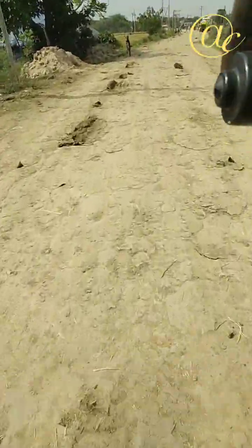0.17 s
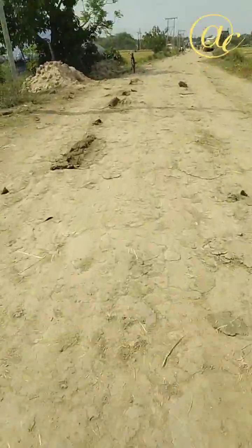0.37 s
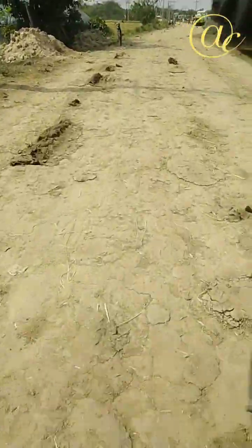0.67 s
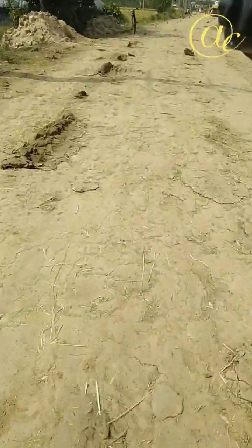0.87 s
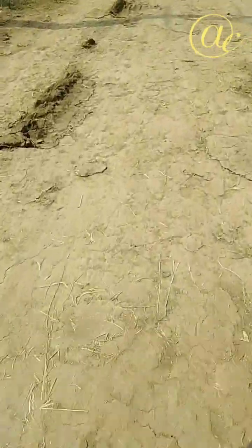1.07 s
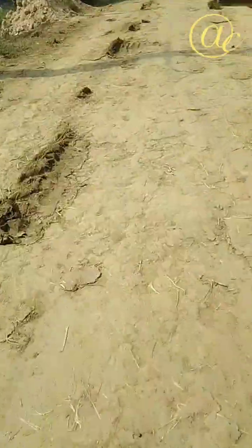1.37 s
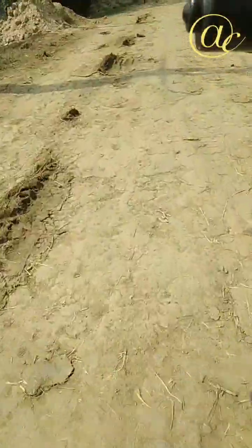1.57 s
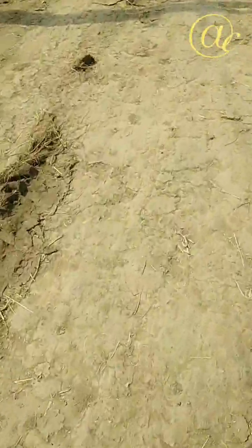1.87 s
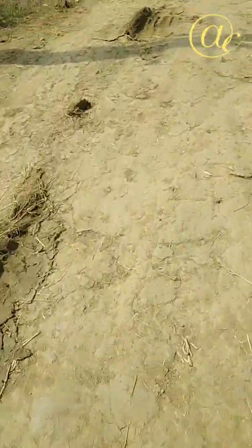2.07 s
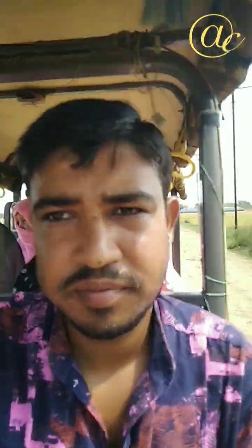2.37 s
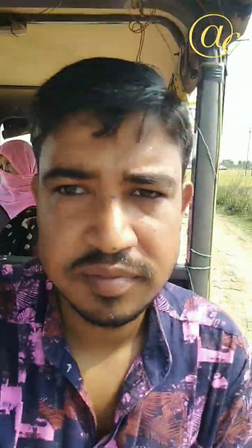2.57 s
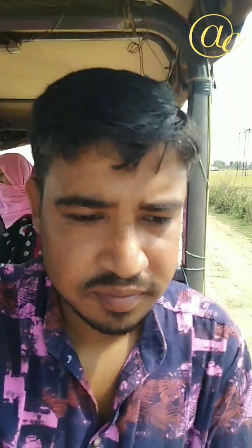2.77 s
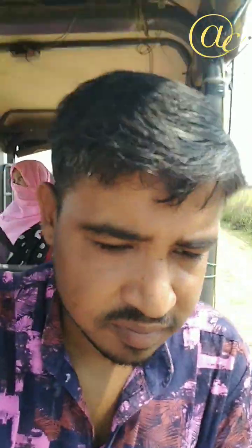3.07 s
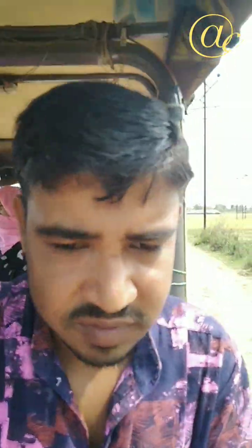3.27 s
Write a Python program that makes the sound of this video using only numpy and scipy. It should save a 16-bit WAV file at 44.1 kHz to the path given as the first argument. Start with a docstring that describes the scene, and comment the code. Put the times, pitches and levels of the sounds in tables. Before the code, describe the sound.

Rattling of a small covered vehicle on dried mud, with low booming, thuds and metallic clacks

```python
"""Tyres grind over a rutted road of dried mud while a small covered three-wheeler rolls along slowly.
The cabin sways and booms as filtered noise, and the wheels thud as short tones that sink in pitch.
Loose panels knock, metal fittings clack and small parts jingle: random tiny contacts that set resonances ringing.
The microphone first faces the road; after a short silent break it is inside the cabin, close to the knocks."""
import sys
import numpy as np
from scipy import signal
from scipy.fft import rfft, irfft
from scipy.io import wavfile

SR = 44100
rng = np.random.default_rng(int(sys.argv[2]) if len(sys.argv) > 2 else 0)


def file_out(sig):
    """Save sig as 16-bit WAV at sys.argv[1]."""
    # one column per channel
    cols = np.atleast_2d(sig).T
    # limit, then scale
    lim = np.clip(cols, -1, 1)
    pcm = np.round(lim * 32767).astype(np.int16)
    wavfile.write(sys.argv[1], SR, pcm)


N = 149940
TIME = np.arange(N) / SR
BREAK_FROM_S, BREAK_TO_S = 2.034, 2.274
CUTOFF_HZ = 15900
STRIKE_S = 0.0016  # time constant of a first strike
CLINK_T60_S = .024  # ringing of small metal pieces

# Bright colour of metal inside the cabin. Each row: frequency in Hz, relative density in dB.
METAL_COLOUR = [(800, -15.5), (2400, 5), (3500, -7.5), (4600, -5), (5500, -0.5), (6600, 1.5), (8000, -1),
                (9300, -12), (16000, -14)]


def from_db(db):
    """Decibels to gain."""
    return 10 ** (np.asarray(db) / 20)


def rms_one(x):
    """Scale to rms 1."""
    return x / np.sqrt(np.mean(x ** 2) + 1e-20)


def noise():
    """White noise of rms 1."""
    return rng.standard_normal(N)


def level(rows):
    """Gain over time, joined in straight lines of dB between rows of seconds and dB."""
    return from_db(np.interp(TIME, *np.transpose(rows)))


def drift(rate_hz):
    """Slow random wandering with spread 1: noise through two equal poles at rate_hz."""
    step = 40  # samples between the computed points
    pole = np.exp(-2 * np.pi * rate_hz * step / SR)
    settling = 2000  # points dropped while the filter starts up
    raw = rng.standard_normal(N // step + 2 + settling)
    slow = signal.lfilter([1], [1, -2 * pole, pole * pole], raw)[settling:]
    return np.interp(np.arange(N) / step, np.arange(len(slow)), rms_one(slow))


def colour(x, spectrum, size=8192):
    """Causal filter with the given spectrum, 12 dB per octave beyond its ends; white noise keeps its power."""
    hz, db = np.transpose(spectrum)
    octave = np.log2(np.maximum(np.arange(size // 2 + 1) * SR / size, 1))
    outside = np.abs(octave - np.clip(octave, np.log2(hz[0]), np.log2(hz[-1])))
    gain = from_db(np.interp(octave, np.log2(hz), db) - 12 * outside)
    # Folding the cepstrum forward gives minimum phase, so nothing sounds ahead of its cause.
    cepstrum = irfft(np.log(gain))
    cepstrum[1:size // 2] *= 2
    cepstrum[size // 2 + 1:] = 0
    response = irfft(np.exp(rfft(cepstrum)))
    return signal.fftconvolve(x, response / np.linalg.norm(response))[:N]


def ring(x, modes):
    """Decaying modes (Hz, dB, t60 in s) driven by x; white noise keeps its power."""
    t = TIME[:SR // 2]
    response = np.zeros(len(t))
    for hz, db, t60 in modes:
        response += from_db(db - 60 * t / t60) * np.sin(2 * np.pi * hz * t)
    return signal.fftconvolve(x, response / np.linalg.norm(response))[:N]


def grains(rate, spread_db):
    """Random tiny contacts, rate per second, of uneven size and either sign; rms 1."""
    sizes = from_db(spread_db * np.minimum(rng.exponential(1, N), 4))
    signs = rng.choice([-1, 1], N)
    touching = rng.random(N) < rate / SR
    return rms_one(sizes * signs * touching)


def scatter(contacts, top_hz, t60, count):
    """Each contact rings one of many resonances spread evenly up to top_hz; the power is kept."""
    dealt = rng.integers(0, count, N)
    pitches = (np.arange(count) + rng.uniform(.2, .8, count)) * top_hz / count
    r = from_db(-60 / (t60 * SR))  # decay per sample
    out = np.zeros(N)
    for k, w in enumerate(2 * np.pi * pitches / SR):
        share = contacts * (dealt == k) + 1e-18  # the tiny offset keeps the filter off denormals
        out += signal.lfilter([1, -r * np.cos(w)], [1, -2 * r * np.cos(w), r * r], share)
    return out * np.sqrt(2 * (1 - r * r))


def since_blow(s):
    """Seconds since the moment s, held between 0 and 1."""
    return np.clip(TIME - s, 0, 1)


def chatter(rows, t60, strike_db, tail_db, tail_t60, linger=0):
    """Envelope of blows: a first strike, a spell of chatter, a decay that lingers with its length, a faint tail."""
    power = np.zeros(N)
    for s, db, length in rows:
        after = since_blow(s + length)
        decay = from_db(-60 * after / (t60 + linger * length))
        tail = from_db(tail_db - 60 * after / tail_t60)
        strike = from_db(strike_db) * np.exp(-since_blow(s) / STRIKE_S)
        power += (from_db(db) * (TIME >= s) * (decay + tail + strike)) ** 2
    return np.sqrt(power)


def swell(s, length):
    """A smooth bump centred on s, with length measured between its 1/e points."""
    return np.exp(-np.minimum((2 * (TIME - s) / length) ** 2, 50))


def inside(outer, inner):
    """The first sound while facing the road, the second in the cabin from the end of the break."""
    return np.where(TIME < BREAK_TO_S, outer, inner)


def tyres():
    """Tyres grind over crusted mud and set the chassis ringing; grit crackles under them."""
    # Loudness of the grind. Each row: time in seconds, level in dB.
    rolling = [(0, -48), (.3, -46.5), (.47, -52.5), (.62, -48), (.9, -51.5), (1.15, -47.5), (1.6, -45.5),
               (1.75, -51.5), (2.5, -49), (2.9, -44), (3.14, -48), (3.4, -49)]
    # Colour of the grind. Each row: frequency in Hz, relative density in dB.
    grind_colour = [(250, 3), (350, 5.5), (500, 1), (750, 2), (1200, 2.5), (1600, -1.5), (2200, -5),
                    (3000, -13.5), (3900, -14), (5000, -22.5)]
    # Colour of the grit heard from the road side. Each row: frequency in Hz, relative density in dB.
    grit_colour = [(2500, -26), (3900, -3), (5000, -8), (7600, 2.5), (9200, -8.5), (12000, -12),
                   (15500, -4)]
    contacts = grains(rate=3600, spread_db=1.5)
    chassis = scatter(contacts, top_hz=4568, t60=.038, count=60)
    grind = level(rolling) * colour(chassis + from_db(-25.5) * contacts, grind_colour)
    crackle = grains(rate=5000, spread_db=3.5) * from_db(2.73 * drift(40))
    grit_outside = from_db(-54.5) * colour(crackle, grit_colour)
    grit_inside = from_db(-54) * colour(crackle, METAL_COLOUR)
    return grind + inside(grit_outside, grit_inside)


def body():
    """The body rocks in the ruts, and the road shakes the cabin at its low resonance."""
    # Ruts that rock the body. Each row: deepest moment in seconds, length in s, added level in dB.
    ruts = [(0.22, 0.11, -43), (1.02, 0.05, -32.5), (1.487, 0.46, -42.5), (2.589, 0.065, -32),
            (2.94, 0.21, -32), (3.233, 0.22, -41.5)]
    # Loudness of the boom. Each row: time in seconds, gain in dB.
    booming = [(0, -40.5), (.47, -42.5), (.7, -42.5), (.87, -45.5), (1.58, -39.5), (1.8, -45.5),
               (2.57, -39.5), (2.78, -45.5), (2.95, -39), (3.4, -42.5)]
    # Colour of the rocking. Each row: frequency in Hz, relative density in dB.
    sway_colour = [(10, -10.5), (38, -6.5), (70, -26.5), (150, -45)]
    # Colour of the broad part of the boom. Each row: frequency in Hz, relative density in dB.
    boom_colour = [(50, -15.5), (95, -4.5), (118, -7.5), (138, -3), (215, -8.5), (255, -17.5), (500, -40.5)]
    rocking = from_db(-43.5) + sum(from_db(db) * swell(s, length) for s, length, db in ruts)
    sway = rocking * colour(noise(), sway_colour)
    broad_boom = from_db(-1) * colour(noise(), boom_colour)
    resonance_hz, resonance_t60_s = 140.8, 0.14
    ringing_boom = from_db(-4) * rms_one(ring(noise(), [(resonance_hz, 0, resonance_t60_s)]))
    return sway + level(booming) * (broad_boom + ringing_boom)


def thuds():
    """The wheels drop into hollows with a short low thud that sinks in pitch."""
    # Each row: centre in seconds, pitch at the centre in Hz before a slight random drift, peak level in dB.
    drops = [(.01, 123, -34), (.705, 205.5, -39.5), (1.005, 139.7, -37), (1.29, 134, -37),
             (1.335, 204, -37), (1.372, 149.8, -36.5), (1.577, 151.3, -36.5), (1.68, 145.7, -30.5),
             (1.98, 138.8, -35.5), (2.915, 134.7, -35), (3.284, 129, -35)]
    length_s, sag_hz_per_s = .06, 280
    out = np.zeros(N)
    for s, hz, db in drops:
        sag = sag_hz_per_s * np.clip(TIME - s, -length_s, length_s)
        pitch = hz - sag + 5 * drift(26)
        out += from_db(db) * swell(s, length_s) * np.sin(2 * np.pi * np.cumsum(pitch) / SR)
    return out


def panels():
    """Loose panels chatter in uneven crunches, and each knock rings hollowly at a pitch of its own."""
    # Each row: start in seconds, relative level in dB, length of the chatter in s, mean panel pitch in Hz.
    knocks = [(0.514, -36.5, 0.0049, 981), (0.615, -37.5, 0.019, 812), (0.684, -38, 0.0035, 1501),
              (0.945, -35, 0.011, 934), (1.03, -38.5, 0.045, 700), (1.302, -37, 0.0032, 1092),
              (1.477, -31.5, 0.016, 1106), (1.543, -33.5, 0.007, 1076), (1.889, -34, 0.013, 775),
              (2.278, -32, 0.022, 1286), (2.33, -31.5, 0.0018, 2417), (2.416, -25, 0.0037, 2446),
              (2.453, -35.5, 0.0076, 586), (2.487, -36, 0.008, 1232), (2.555, -31.5, 0.018, 1222),
              (2.573, -29.5, 0.011, 886), (2.616, -35.5, 0.011, 888), (2.67, -34, 0.022, 1260),
              (2.714, -32, 0.011, 947), (2.787, -32.5, 0.037, 1577), (2.85, -33, 0.012, 586),
              (2.931, -33.5, 0.008, 963), (2.986, -33.5, 0.036, 776), (3.072, -34, 0.024, 1467),
              (3.152, -39, 0.0047, 594), (3.184, -28.5, 0.0032, 2142), (3.252, -36, 0.0071, 587),
              (3.353, -37.5, 0.019, 1030)]
    # Colour of the panels from the road side. Each row: frequency in Hz, relative density in dB.
    colour_outside = [(100, -5.5), (300, -2), (500, -3.5), (780, 2.5), (1250, 1.5), (2300, -8.5),
                      (3000, -16.5), (4000, -4.5), (5500, -35.5)]
    # Colour of the panels in the cabin. Each row: frequency in Hz, relative density in dB.
    colour_inside = [(250, -8), (580, 3.5), (1200, 2.5), (1700, 3.5), (2500, -0.5), (3200, -7.5),
                     (7000, -13.5), (9500, -55)]
    crunch = rms_one(from_db(1.4 * drift(150)))
    blows = chatter([row[:3] for row in knocks], t60=.08, strike_db=1, tail_db=-21.5, tail_t60=.18)
    force = grains(rate=3400, spread_db=2.5) * crunch * blows
    sound = from_db(-11.5) * force + from_db(-14) * scatter(force, top_hz=3300, t60=0.028, count=28)
    hollow = np.zeros(N)
    hollow_t60_s, waver = 0.064, 0.0148  # waver is the spread of the pitch as a fraction
    for s, db, length, hz in knocks:
        onset = 1 - np.exp(-since_blow(s) / STRIKE_S)
        swing = onset * from_db(db - 60 * since_blow(s + length) / hollow_t60_s)
        wavering_time = np.cumsum(1 + waver * drift(150)) / SR
        hollow += swing * np.sin(2 * np.pi * hz * wavering_time)
    return inside(colour(sound, colour_outside), colour(sound, colour_inside)) + from_db(-4.5) * hollow


def fittings():
    """Metal fittings clack against the frame and ring briefly."""
    # Each row: start in seconds, relative level in dB, length of the chatter in s.
    clacks = [(1.481, -41, 0.014), (2.282, -29, 0.0017), (2.331, -48, .001), (2.416, -28.5, 0.0058),
              (2.681, -36.5, 0.0051), (2.941, -35, 0.0025), (3.011, -44.5, 0.0041), (3.183, -34, 0.0031),
              (3.303, -47, 0.0091), (3.36, -33, 0.0015)]
    # Ringing of the fittings. Each row: frequency in Hz, relative level in dB, decay by 60 dB in s.
    fitting_modes = [(5420, -2, 0.051), (5600, 0.5, 0.06), (6450, -3.5, 0.055)]
    blows = chatter(clacks, t60=0.0062, strike_db=-10, tail_db=-10.5, tail_t60=0.18, linger=5)
    force = grains(rate=7000, spread_db=1.5) * blows
    clinks = scatter(force, top_hz=CUTOFF_HZ, t60=CLINK_T60_S, count=60)
    sound = from_db(-5.5) * force + from_db(-6.5) * clinks
    return colour(sound, METAL_COLOUR) + from_db(-12.5) * ring(force, fitting_modes)


def small_parts():
    """Small loose parts clink brightly on the bumps, keep up a faint rattle and now and then squeak."""
    # Each row: start in seconds, relative level in dB, length of the jingling in s.
    jingles = [(0, -44.5, 0.025), (.243, -42, 0.0047), (.395, -39.5, 0.0033), (.422, -41.5, 0.0095),
               (.605, -42, .04), (.666, -42, 0.015), (1.069, -42.5, 0.011), (1.262, -37.5, 0.0092),
               (1.308, -46, 0.0069), (1.483, -39, 0.0078), (2.002, -43, 0.037)]
    # Squeaks of metal on metal. Each row: centre in seconds, mean pitch in Hz, peak level in dB, length in s.
    squeak_rows = [(0.552, 10080, -50.5, .025), (0.632, 5400, -48, .03), (1.7, 4020, -51, 0.047),
                   (1.782, 7370, -41, 0.0085), (2.01, 9600, -42.5, 0.015), (3.084, 7020, -40, 0.015)]
    # Colour of the clinks. Each row: frequency in Hz, relative density in dB.
    clink_colour = [(1500, -1), (3800, -4), (7500, 3), (9500, -5), (12000, -5), (15500, 3.5)]
    bumps = chatter(jingles, t60=0.064, strike_db=2.5, tail_db=-34.5, tail_t60=.15)
    rattle = from_db(-60.5 + 6.1 * np.minimum(drift(11), 1)) * inside(0.6, 0.24)
    force = grains(rate=2000, spread_db=1.0) * (bumps + rattle)
    ringing = scatter(force, top_hz=CUTOFF_HZ, t60=CLINK_T60_S, count=60)
    clinks = from_db(-6.5) * force + from_db(-6.0) * ringing
    wavering_time = TIME + np.cumsum(0.013 * drift(250)) / SR
    squeaks = np.zeros(N)
    for s, hz, db, length in squeak_rows:
        squeaks += from_db(db) * swell(s, length) * np.sin(2 * np.pi * hz * wavering_time)
    return colour(clinks, clink_colour) + squeaks


def scene():
    """Everything heard on the ride, in mono."""
    return (tyres() + body() + thuds() + panels() + fittings() + small_parts())[None]


def record(dry):
    """The sound drops out during the break, with 2 ms fades, and a steep low-pass cuts the top."""
    outside_break_s = np.maximum(BREAK_FROM_S - TIME, TIME - BREAK_TO_S)
    running = np.clip(outside_break_s / .002, 0, 1)
    low_pass = signal.ellip(12, .1, 80, CUTOFF_HZ, fs=SR, output="sos")
    return signal.sosfilt(low_pass, dry * running)


dry = scene()
out = record(dry)
file_out(out)
```